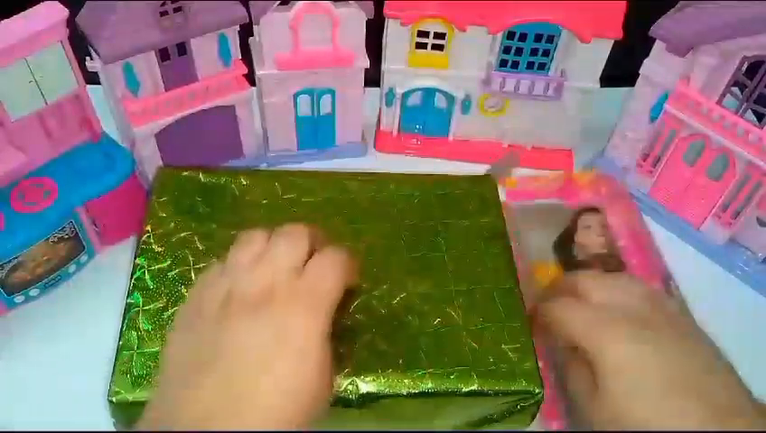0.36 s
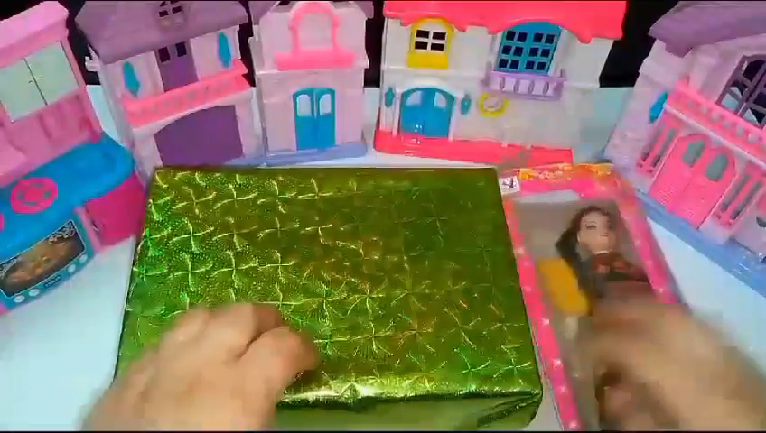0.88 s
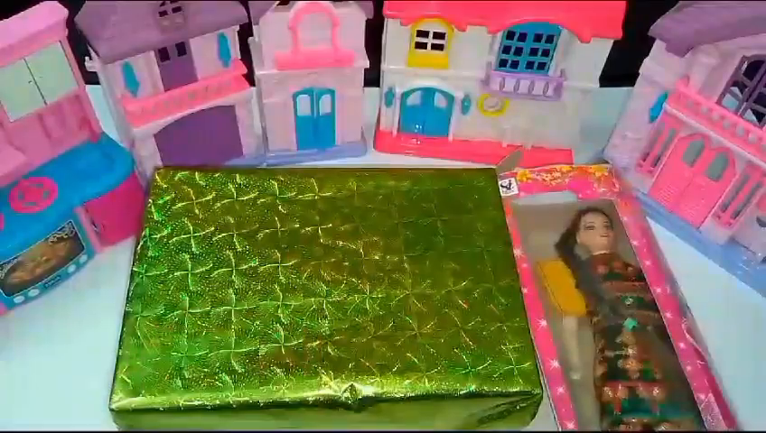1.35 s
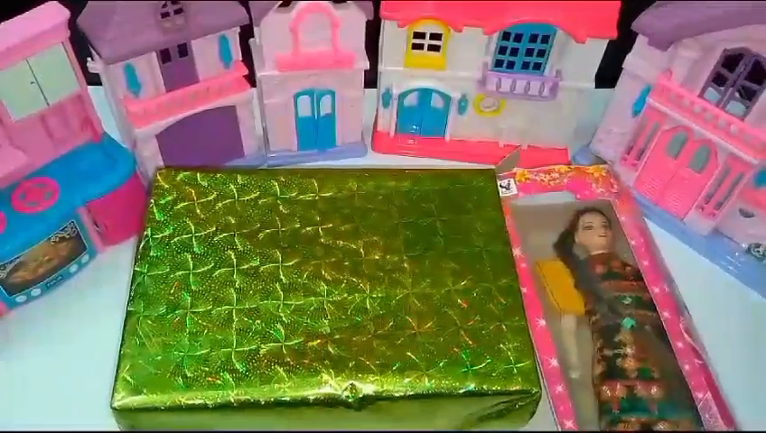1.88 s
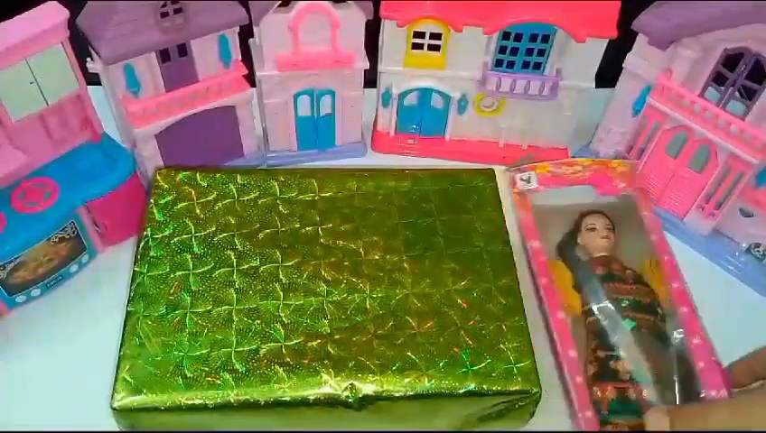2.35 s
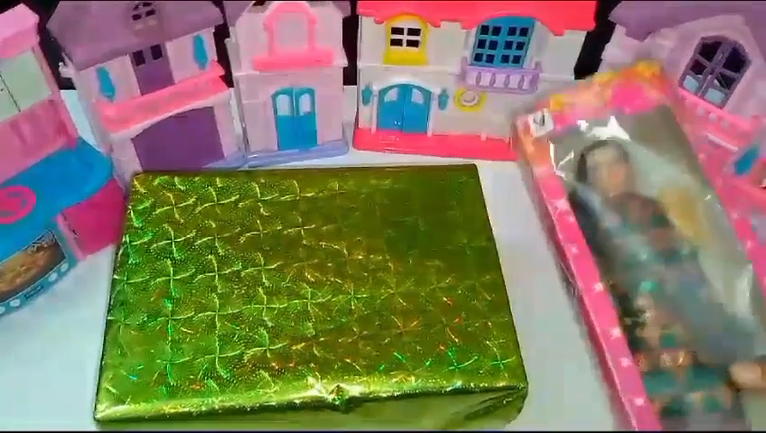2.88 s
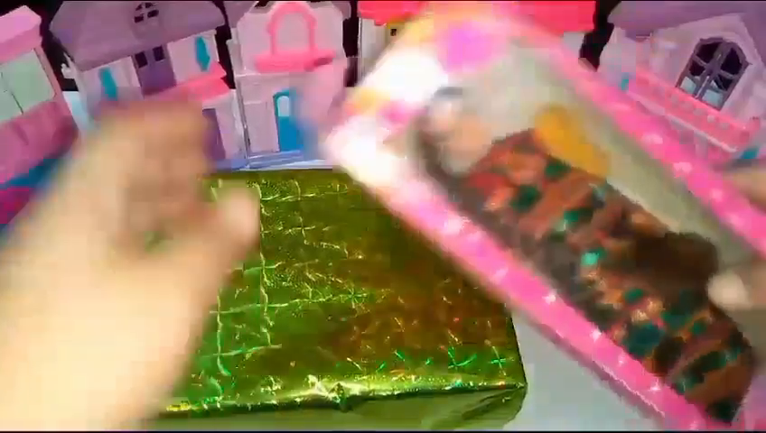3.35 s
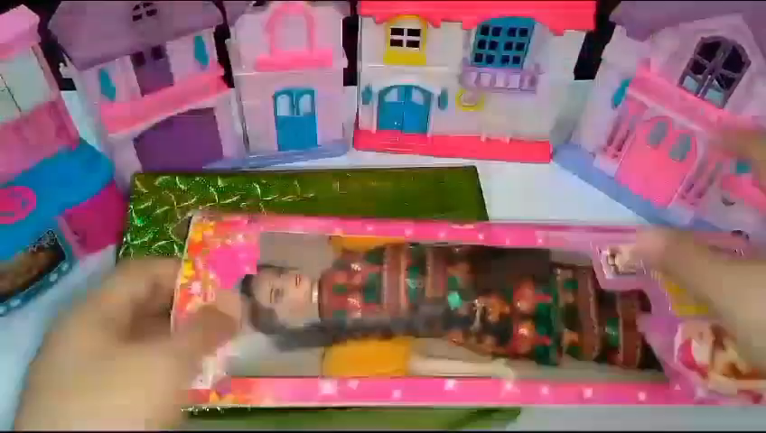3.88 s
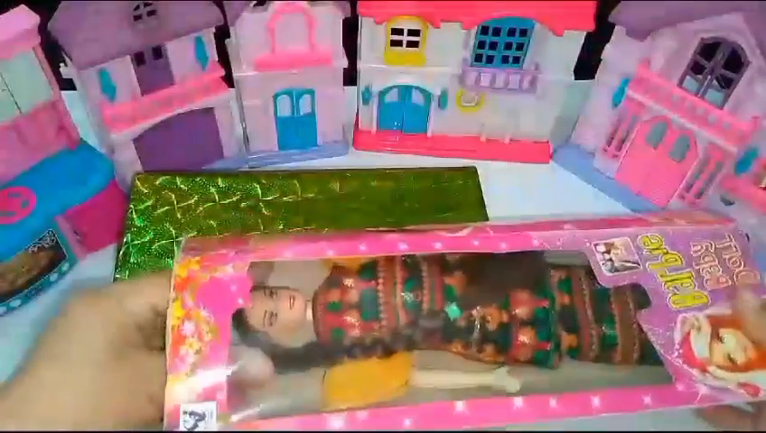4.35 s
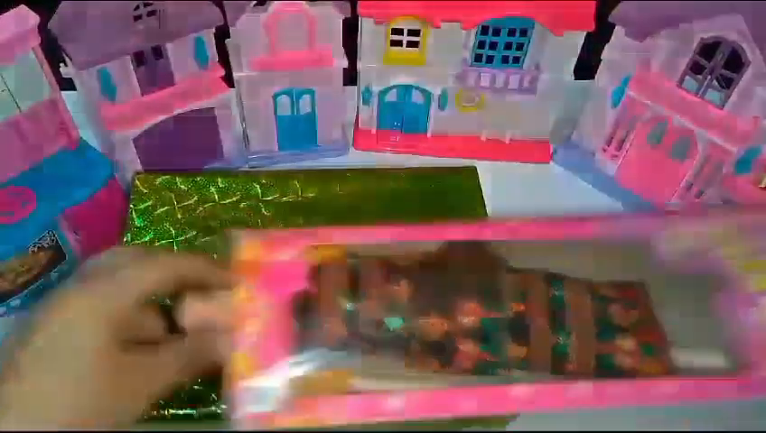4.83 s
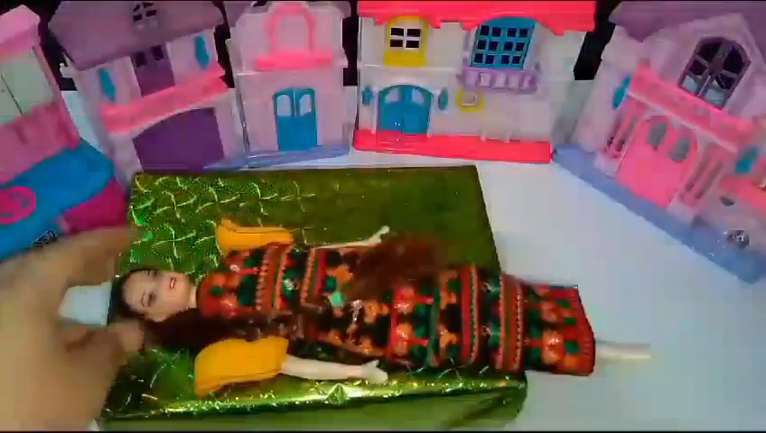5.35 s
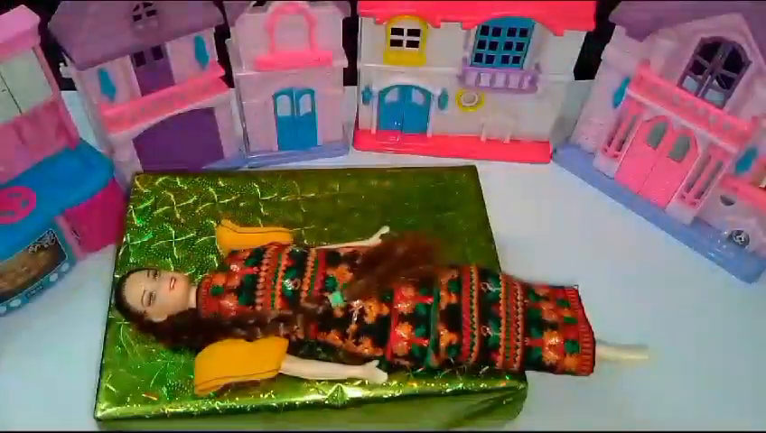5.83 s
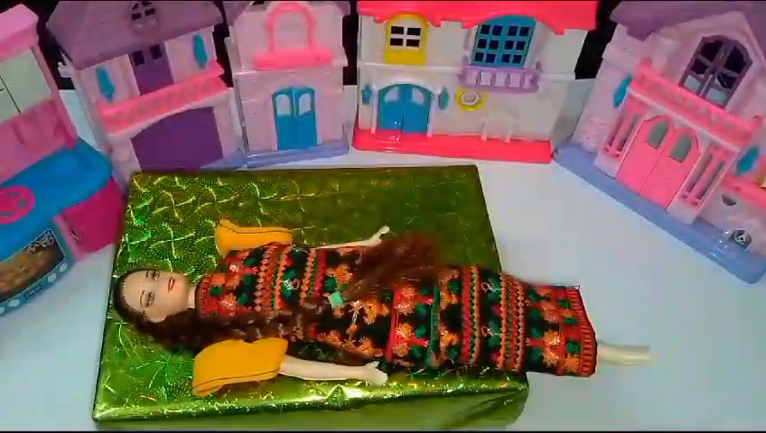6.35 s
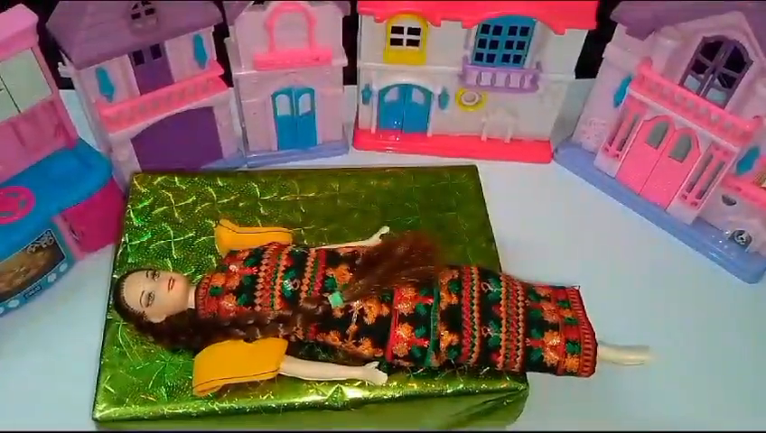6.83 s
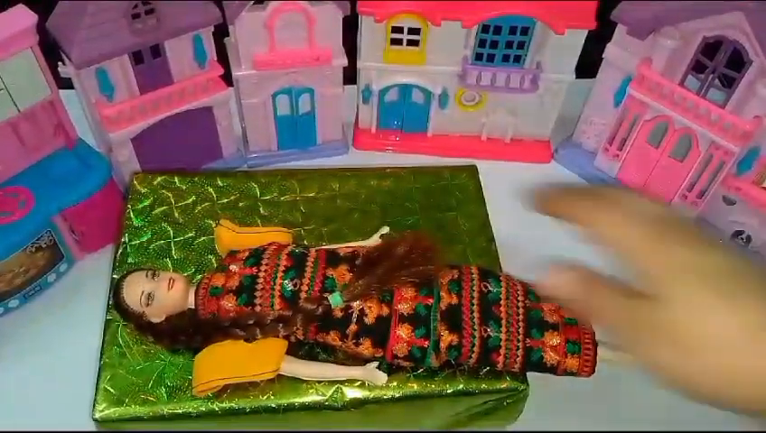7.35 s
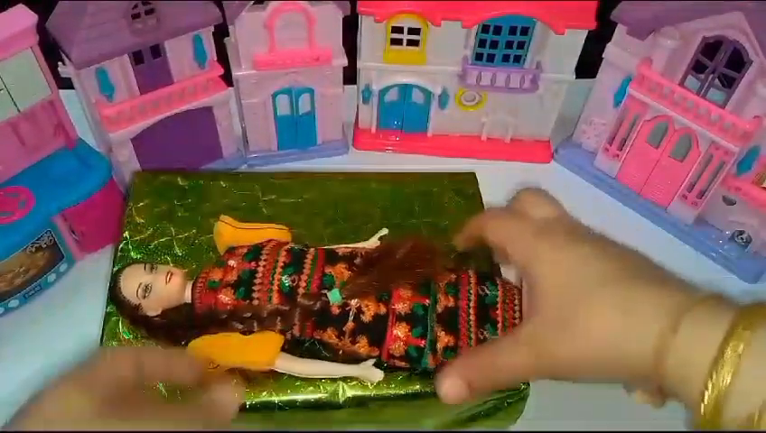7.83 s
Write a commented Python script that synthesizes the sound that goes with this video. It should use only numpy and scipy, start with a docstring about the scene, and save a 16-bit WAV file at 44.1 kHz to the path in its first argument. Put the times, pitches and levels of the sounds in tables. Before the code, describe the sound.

Close fingertips tap a foil-wrapped carton and a toy box about four times within the first second, each a soft hollow thud with crisp crinkle. After a pause, plastic ticks and pings as the box is picked up, then it rustles, scrapes open and slides off a doll. Later, fainter bumps and rustles come from farther away. Hard, echoing room, faint air noise.

```python
"""Fingertips on toy packaging

Fingertips drum on a foil-wrapped carton and on a toy box with a plastic window; then the box is lifted, opened,
slid off its doll and put down further away. Creases and sliding hands are noise shaped by foil, card and plastic;
thuds, window pings and a lightly tinkling bangle are fading sine waves.
A hard room answers with dense echoes and low resonances, over the low rumble of the handling and steady air.
"""
import sys
import numpy as np
from scipy import signal
from scipy.fft import rfft, irfft, next_fast_len
from scipy.io import wavfile
from scipy.ndimage import uniform_filter1d, map_coordinates

SR = 44100
rng = np.random.default_rng(int(sys.argv[2]) if len(sys.argv) > 2 else 0)


def unload_wav(signal):
    """Save mono or channel-first audio to the path in sys.argv[1] as 16-bit WAV at rate SR, clipped to [-1, 1]."""
    wavfile.write(
        sys.argv[1],
        SR,
        np.round(np.clip(np.atleast_2d(signal).T, -1, 1) * 32767).astype(np.int16),
    )


def ratio(d):
    """dB to gain"""
    e = np.asarray(d, float) / 20
    return 10 ** e


N = 351020  # length of the sound in samples
FAR_S = 6.1  # from here on the box is handled away from the table (s)

# Hands sliding on card and plastic:
# (start [s], length [s], plastic rustle [dB], hollow scrape [dB], skin hiss [dB])
STROKES = [(0.154, 0.13, -52, -55, -80), (0.41, .13, -62, -55, -86), (0.605, 0.18, -69.5, -57, -101),
           (0.839, 0.11, -59, -64, -89), (2.134, 0.071, -76, -92, -72), (2.298, 0.56, -75, -81, -101),
           (3.568, 0.083, -51.5, -54.5, -71), (3.723, 0.052, -51, -46.5, -71),
           (3.84, 0.18, -67.5, -59.5, -101), (4.047, 0.13, -78, -61, -90), (4.815, 0.096, -56, -54, -86),
           (4.921, 0.19, -63, -53.5, -81), (5.005, 0.17, -75, -48.5, -94),
           (5.177, 0.065, -61.5, -57.5, -84), (5.254, 0.058, -83, -57, -92), (6.273, 0.18, -56.5, -58, -90),
           (6.58, 0.21, -75, -70, -100), (6.742, .1, -60, -61, -87), (6.829, 0.14, -57.5, -57, -88),
           (6.982, 0.16, -73.5, -62.5, -95)]
# Low resonances of the room: (frequency [Hz], width [Hz], level [dB])
LOW_ROOM_MODES = [(117.6, 8, -2.5), (141, 23, 0), (196.7, 21.7, 1), (232, 40, -6.5), (292, 39, -2.5),
                  (406.1, 16, -6), (465, 25.4, -12.5)]
# How long the room's echoes take to fade by 60 dB: (frequency [Hz], time [s])
ECHO_TIMES = [(150, 0.55), (400, 0.98), (1000, 0.58), (3000, 0.33), (6000, 0.42), (8300, 0.43),
              (10000, 0.3), (15000, 0.25)]


def unit(x):
    """Scale a sound to an rms of 1."""
    return x / np.sqrt(np.mean(x ** 2) + 1e-20)


def along(points, hz):
    """Read a curve of (frequency [Hz], value) points on a log frequency axis."""
    point_hz, values = np.transpose(points)
    return np.interp(np.log(hz + 1), np.log(point_hz + 1), values)


def filtered(x, response):
    """Shape a sound with a complex response, given as a function of frequency."""
    size = next_fast_len(N + SR // 2)  # spare room, so that ringing does not wrap round
    spectrum = rfft(x, size) * response(np.fft.rfftfreq(size, 1 / SR))
    return irfft(spectrum, size)[..., :N]


def modes(table):
    """Response of a body with several resonances, added with alternating signs."""
    def response(f):
        total = 0
        for k, (centre, width, db) in enumerate(table):
            resonance = 1j * f * width / (centre * centre - f * f + 1j * f * width)
            total = total + (-1) ** k * ratio(db) * resonance
        return total
    return response


def colour(spectrum):
    """Response that follows a curve of (frequency [Hz], level [dB]) points."""
    return lambda f: ratio(along(spectrum, f))


def low_cut(hz, order):
    """Response that weakens everything below a frequency; a higher order is steeper."""
    return lambda f: (1j * f / (1j * f + hz)) ** order


def wobble(rate):
    """A smooth random curve through a given number of random points per second."""
    points = rng.standard_normal(int(N * rate / SR) + 4)
    return map_coordinates(points, [np.arange(N) * rate / SR])


def patchy(patchy_db, size):
    """White noise of rms 1 whose colour changes in random patches of time and frequency."""
    z = signal.stft(rng.standard_normal(N), nperseg=size)[2]
    field = uniform_filter1d(rng.standard_normal(z.shape), size=3, axis=0)
    field = uniform_filter1d(field, size=5, axis=1)
    noise = signal.istft(z * ratio(patchy_db * unit(field)), nperseg=size)[1]
    return unit(noise[:N])


def through(drive, noise, response):
    """Noise under an envelope excites a body; a steady envelope of 1 would give a level of 1."""
    return filtered(drive * noise, response) / np.std(filtered(noise, response))


def foil(f):
    """Foil and plastic have broad resonances and radiate little at the very top and at the bottom."""
    # Foil and plastic window: (frequency [Hz], width [Hz], level [dB])
    sheet_modes = [(1920, 656, 1.5), (3070, 2250, -2), (5120, 2270, -6.5), (7350, 2830, -20)]
    top_hz, low_hz = 8600, 1300
    top = 1 / (1 + .9j * f / top_hz - (f / top_hz) ** 2) ** 3
    return modes(sheet_modes)(f) * top * low_cut(low_hz, 2)(f)


def ticks():
    """Small creases catch at random moments of every stroke, louder where the plastic rustles louder."""
    ticks_per_s = 70
    base_db, spread_db = -8, 2.5  # base level against the rustle; a random part is added
    rise_ms, carton_db, treble_db = 2.6, -6, -40
    rows = []
    for start, length, rustle_db, *_ in STROKES:
        count = int(np.ceil(length * ticks_per_s))
        for place, size in rng.random((count, 2)):
            level_db = rustle_db + base_db - spread_db * np.log(size + 0.066)
            rows.append((start + place * length, level_db, carton_db, treble_db, rise_ms))
    return rows


def crinkles():
    """Each crease is a short swarm of tiny snaps in foil, carton and treble; gives the dry sound and room feed."""
    # Creases of foil, card and plastic giving way; carton and treble are relative to the level:
    # (time [s], level [dB], carton [dB], treble [dB], rise [ms])
    creases = [(0, -32, 8.5, -40, 1.6), (0.132, -35.5, 5.5, -21, 9.6), (0.152, -29.5, -15, -23, 6.3),
               (0.171, -50, 10, -3, 1.3), (0.207, -44, -2, -34, 4.6), (0.267, -44, 3, -45, 11.5),
               (0.368, -28, 1, -20, 7.8), (0.393, -44, 3, -8, 2.6), (0.442, -48, -1, -24, 11),
               (0.569, -34, 1.5, -36, 10.5), (0.586, -61.5, -6, -25, 1.3), (0.632, -45.5, 5.5, -45, 3.4),
               (0.7226, -68, 23, -42, 4.6), (0.799, -44.5, 11, -26, 4.3), (0.806, -30, 0.5, -26, 8.6),
               (0.833, -36.5, -4, -20, 5), (0.926, -47.5, 6, -39, 9.8), (2.247, -54, 4.5, -46, 4.8),
               (2.258, -64.5, 11.5, -25, 6.9), (2.3312, -53, -1.5, -35, 2.9), (2.34, -59, 8, -34, 2.8),
               (2.37, -55.5, 3, -35, 3.1), (2.39, -51, -8, -22, 1.4), (2.3968, -49.5, 1, -19, 6.2),
               (2.4985, -47, -4, -13.5, 3.6), (2.615, -46, -6, -18, 3), (2.856, -56, 8.5, -24, 2.3),
               (3.49, -59, 6, -17, 1.8), (3.51, -54, -1.5, -28, 1.9), (3.578, -53, 2, -15, 3),
               (3.5878, -51, -9, -21, 3.4), (3.598, -51.5, 5, -25, 11), (3.635, -40.5, 0.5, -23, 11),
               (3.678, -49, 5.5, -31, 7.6), (3.7294, -45, -4, -17, 3.6), (3.757, -33.5, -12, -15, 3.4),
               (3.769, -40, 4, -26, 11.3), (3.801, -42, -10, -19, 4.1), (3.8249, -52, 15.5, -12, 1.3),
               (3.9312, -43, 1, -39, 5.6), (3.949, -50.5, 3, -42, 1.9), (4.121, -61.5, 2, -24, 10.3),
               (4.15, -61, 5, -23, 3.7), (4.395, -51.5, -17, -4.5, 2.6), (4.759, -58.5, -3, -40, 2.1),
               (4.831, -60.5, 6, -26, 2.8), (4.8513, -61, 10, -37, 1.9), (4.862, -63, 15, -35, 5.6),
               (4.892, -54, 8, -33, 2.3), (4.943, -65.5, 20.5, -43, 2.7), (5.051, -52, -6, -11, 3.5),
               (5.142, -57.5, -4, -40, 1.8), (5.205, -62, 7, -16, 9), (5.235, -54, -15, -14, 3.5),
               (5.3505, -58.5, 14, -30, 0.8), (5.5137, -45.5, -3, -48, 6.1), (5.9496, -74, 18, -22, 2.5),
               (6.199, -55.5, -2, -28, 9.3), (6.238, -57, 0, -37, 7.8), (6.247, -36, 2, -25, 6),
               (6.258, -51, -8, -25, 3.2), (6.278, -47, 6.5, -28, 3.2), (6.368, -49.5, 0, -45, 7.5),
               (6.589, -51, -25, -48, 2.3), (6.6945, -54, -18, -47, 3.8), (6.7246, -52, -4, -32, 4.8),
               (6.7377, -55, 3.5, -41, 7.4), (6.761, -49, 0, -40, 7.8), (6.785, -41, -2.5, -55, 9.8),
               (6.811, -43.5, -4.5, -50, 7.9), (7.606, -67.5, -10, -1, 1.7)]
    # Air and walls of the box: (frequency [Hz], width [Hz], level [dB])
    carton = [(550, 665, -10.5), (950, 640, -1.5), (1272, 285, 3)]
    # Treble of the creases: (frequency [Hz], level [dB])
    sheen = [(7000, -50), (9000, 0), (12000, -7), (15700, -12)]
    near_room_db, far_room_db = -7, 1  # what the foil part of a 5 ms crease feeds to the room
    slow_room_db = 0.5  # slower creases feed the room more: dB per doubling of the rise
    far_carton_db = -0.5  # the far box lies open and sounds less hollow
    far_treble_db = -5  # distance dulls the creases
    silent_db = -120

    drive = np.zeros((2, 3, N + SR))  # dry and room feed, each for foil, carton and treble
    t = np.arange(SR // 12) / SR
    sharpness = np.array([[2.2], [1.4], [3.2]])  # the treble snaps crowd closest round the peak
    for s, db, carton_db, treble_db, rise_ms in creases + ticks():
        far = s > FAR_S
        room_db = (far_room_db if far else near_room_db) + slow_room_db * np.log2(rise_ms / 5)
        carton_db = carton_db + far_carton_db * far
        treble_db = treble_db + far_treble_db * far
        u = 1000 * t / rise_ms
        swarm = (u * np.exp(1 - u)) ** sharpness
        levels = ratio(db + np.array([[0], [carton_db], [treble_db]]))
        # a crease at the very start is already past: only its echo is heard
        dry_db = silent_db * (s <= 0)
        send = ratio([[dry_db] * 3, [room_db, room_db + 0.27, room_db - 11]])
        start = round(s * SR)
        drive[:, :, start:start + len(t)] += send[:, :, None] * levels * swarm

    snaps = ratio(2.5 * wobble(900))  # the swarm is made of uneven grains
    noises = [unit(snaps * ratio(1.5 * wobble(600)) * patchy(3, size=128)) for _ in range(3)]
    bodies = foil, modes(carton), colour(sheen)
    out = np.zeros((2, N))
    for k, (noise, body) in enumerate(zip(noises, bodies)):
        out += np.array([through(envelope, noise, body) for envelope in drive[:, k, :N]])
    return out


def thuds():
    """A soft pad or a box corner sets off a few low cycles of the lid; gives the dry sound and room feed."""
    # Finger pads and box corners landing: (time [s], level [dB], pitch [Hz])
    landings = [(0.14, -25.5, 304), (0.349, -26.5, 232), (0.377, -33.5, 451), (0.577, -28.5, 187),
                (0.805, -24, 316), (0.819, -23.5, 405), (2.494, -45.5, 292), (3.703, -38, 268),
                (3.754, -51, 193), (5.237, -35, 212), (6.799, -32, 255), (6.819, -36, 441)]
    # Resonances of the carton lid: (multiple of pitch, level [dB], time to fade by 60 dB [s])
    lid_modes = [(0.999, 4.5, 0.038), (1.42, -1.5, 0.035), (2.1, -9, 0.075), (2.8, -13, 0.051)]
    boom_db = -5.5  # what of a thud spreads to the walls
    out = np.zeros((2, N + SR))
    t = np.arange(SR // 10) / SR
    soft_start = 1 - np.exp(-t / 0.0022)
    for s, db, hz in landings:
        swing = 0
        for multiple, level_db, t60 in lid_modes:
            swing = swing + ratio(level_db - 60 * t / t60) * np.sin(2 * np.pi * multiple * hz * t)
        start = round(s * SR)
        out[:, start:start + len(t)] -= ratio([[db], [db + boom_db]]) * soft_start * swing
    return out[:, :N]


def rubs():
    """Sliding card sounds the hollow box, plastic rustles, skin hisses; all in uneven grains."""
    # The two resonance tables are applied twice, which sharpens them and doubles their dB.
    # Rubbed plastic tray: (frequency [Hz], width [Hz], level [dB])
    tray = [(1650, 380, 8.5), (2740, 650, 6.5), (3157, 72, 12), (3790, 410, 2.5), (4180, 104, 8.5),
            (4850, 900, 4), (4760, 230, -19), (5840, 530, -19)]
    # Air in the open box: (frequency [Hz], width [Hz], level [dB])
    box_air = [(840, 240, 0)]
    # A palm brushing plastic: (frequency [Hz], level [dB])
    palm = [(3000, -30), (5800, 0), (10000, -5), (15500, -14)]
    attack = 0.47  # share of the stroke spent pressing down
    release_db_per_s = 152  # fade once the hand lets go
    t = np.arange(N) / SR
    drive = np.zeros((3, N))
    for s, length, *levels_db in STROKES:
        press = np.clip((t - s) / (attack * length), 0, 1) ** 2
        release = ratio(-release_db_per_s * np.clip(t - s - length, 0, None))
        drive += ratio(levels_db)[:, None] * press * release
    rustle_drive, scrape_drive, hiss_drive = drive

    stutter = ratio(3 * wobble(45))  # the card sticks and slips
    scrape = through(scrape_drive * stutter, patchy(2, size=512), lambda f: modes(box_air)(f) ** 2)
    rustle_grain = ratio(2.5 * wobble(90))
    rustle = through(rustle_drive * rustle_grain, patchy(3, size=1024), lambda f: modes(tray)(f) ** 2)
    hiss_grain = ratio(0.67 * wobble(120))
    hiss = through(hiss_drive * hiss_grain, patchy(3.9, size=256), colour(palm))
    return scrape + rustle + hiss


def pings():
    """The taut plastic window pings: one fading sine wave with a soft start for each ping."""
    # Pings of the window: (time [s], level [dB])
    window_pings = [(2.368, -51), (2.398, -38.5), (2.43, -59), (2.446, -65), (2.466, -60), (2.498, -46)]
    pitch_hz, t60 = 4150, 0.045  # t60: time to fade by 60 dB (s)
    out = np.zeros(N + SR)
    t = np.arange(SR // 10) / SR
    tone = (1 - np.exp(-t / .0015)) * np.sin(2 * np.pi * pitch_hz * t)
    for s, db in window_pings:
        out[round(s * SR):][:len(t)] += ratio(db - 60 * t / t60) * tone
    return out[:N]


def bangle():
    """Thin metal rings touch lightly: several high tones ring, each fading at its own speed."""
    # Tones of the metal: (frequency [Hz], level [dB], time to fade by 60 dB [s])
    metal_tones = [(4310, -5, 0.13), (6325, -5, 0.15), (8600, -10, 0.36), (11340, -1, 0.09),
                   (14320, 1, .11)]
    # Touches: (time [s], level [dB])
    touches = [(7.533, -71), (7.89, -83)]
    out = np.zeros(N + SR)
    t = np.arange(SR // 4) / SR
    for s, db in touches:
        for hz, level_db, t60 in metal_tones:
            tone_db = db + level_db + rng.normal(0, 1.7)  # no two touches are alike
            out[round(s * SR):][:len(t)] += ratio(tone_db - 60 * t / t60) * np.sin(2 * np.pi * hz * t)
    return out[:N]


def diffuse(x, build_s, shorten):
    """Dense echoes: the sound's energy builds up, dies at each frequency's speed and shapes fresh noise."""
    hz, t, z = signal.stft(x, SR, nperseg=256, noverlap=192)
    hop_s = t[1]
    energy = uniform_filter1d(np.abs(z) ** 2, size=7, axis=0)
    build = np.exp(-hop_s / build_s) + 0 * hz
    decay = ratio(-2 * 60 * hop_s / along(ECHO_TIMES, hz) / shorten)  # twice, as it acts on energy
    for kept_share in build, decay:
        energy = np.array([signal.lfilter([1 - k], [1, -k], row) for k, row in zip(kept_share, energy)])
    noise = ratio(0.39 * wobble(110)) * patchy(1.7, size=1024)
    grain = signal.stft(noise, SR, nperseg=256, noverlap=192)[2]
    shaped = grain / np.std(grain) * np.sqrt(np.abs(energy))
    return signal.istft(shaped, SR, nperseg=256, noverlap=192)[1][:N]


def walls(x):
    """Walls return a sound as a noisy tail in which each frequency dies at its own speed."""
    hz, t, z = signal.stft(rng.standard_normal(SR), SR, nperseg=256)
    fade = ratio(-60 * t / along(ECHO_TIMES, hz)[:, None])
    tail = signal.istft(z * fade, SR, nperseg=256)[1]
    tail = tail * (1 - np.exp(-np.arange(len(tail)) / SR / 0.0013))  # soft start
    return signal.fftconvolve(x, tail / np.linalg.norm(tail))[:N]


def room(feed, boom):
    """The room answers creases and pings with dense echoes, and thuds with a tail and its low resonances."""
    far = np.arange(N) / SR > FAR_S
    # near sounds die sooner among the toys on the table; far ones ring the whole room
    near_echo = diffuse(feed * ~far, build_s=0.013, shorten=0.92)
    far_echo = diffuse(feed * far, build_s=0.012, shorten=1.0)
    echo = filtered(near_echo + far_echo, low_cut(150, 2))
    ring = ratio(1) * filtered(boom, modes(LOW_ROOM_MODES))
    return echo + walls(boom) + ring


def rumble_and_air():
    """The handling's low rumble, noise in the room's low resonances, over steady air and microphone hiss."""
    # Low rumble of the handling, which rises and falls with it: (time [s], level [dB])
    rumble_levels = [(0.0, -46), (0.24, -51.5), (1.09, -49.5), (1.33, -57.5), (2.1, -57.5), (2.5, -51.5),
                     (3.37, -62), (3.83, -49), (4.61, -59), (5.14, -49), (5.74, -65.5), (5.99, -60),
                     (6.23, -57), (6.96, -51.5), (7.21, -55), (7.49, -67), (7.69, -66), (7.96, -58.5)]
    # Colour of the steady air: (frequency [Hz], level [dB])
    air_colour = [(12, -16), (20, -13), (34, 3.5), (55, -22.5), (113, 1.5), (197, 0), (363, -13.5),
                  (406, -17), (454, -10.5), (616, -11.5), (1110, -10), (1380, -16.5), (2350, -21),
                  (15600, -47.5)]
    s, db = np.transpose(rumble_levels)
    level = ratio(np.interp(np.arange(N) / SR, s, db) + 1.5 * wobble(14))
    rumble = through(level, patchy(3.1, size=2048), modes(LOW_ROOM_MODES))
    spectrum = [*air_colour, (16500, -120)]  # falls to silence at the top
    air = unit(filtered(patchy(1, size=512), colour(spectrum)))
    return rumble + ratio(-60.5) * air


def scene():
    """Mix the handling sounds, the answer of the room, and the rumble and background."""
    creases, feed = crinkles()
    knocks, boom = thuds()
    window = pings()
    slides = rubs()
    feed = feed + ratio(-22) * window
    wet = room(feed, boom)
    return (creases + knocks + slides + window + bangle() + wet + rumble_and_air())[None]


def band_limit(x):
    """A steep low-pass at the top of the band."""
    return signal.sosfilt(signal.butter(12, 15770, fs=SR, output="sos"), x)


def record(dry):
    """A phone microphone with a steep bass cut and a small constant offset; a separate step cuts the top."""
    bass_cut = low_cut(60, 2)
    heard = filtered(dry, lambda f: bass_cut(f) * (f < 15770))  # the top cut is not the microphone's
    mix = heard - .0005
    return band_limit(mix)


dry = scene()
out = record(dry)
unload_wav(out)
```